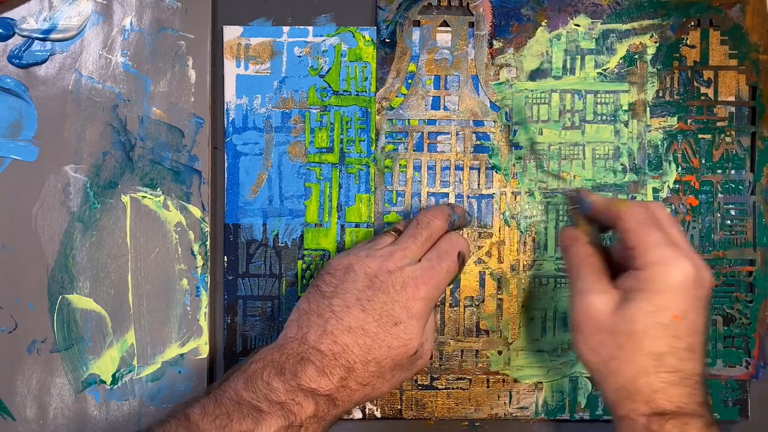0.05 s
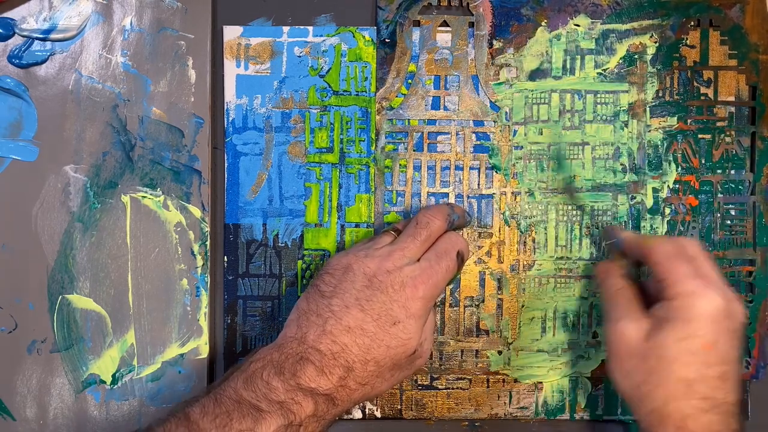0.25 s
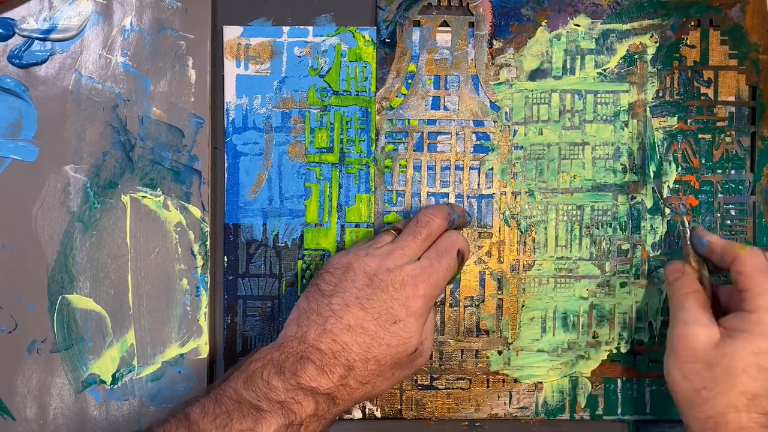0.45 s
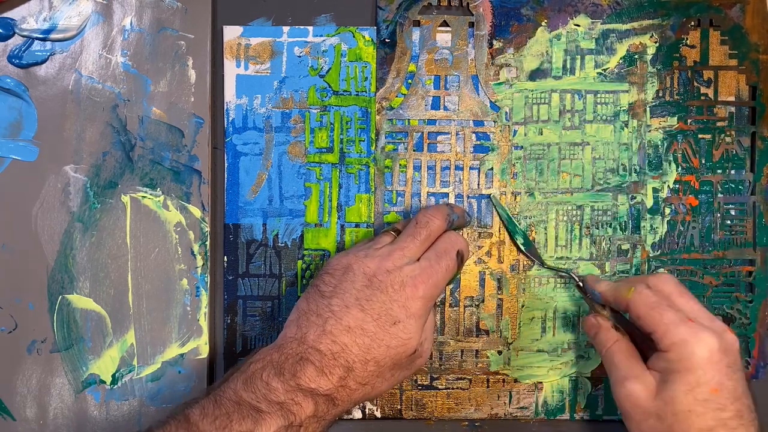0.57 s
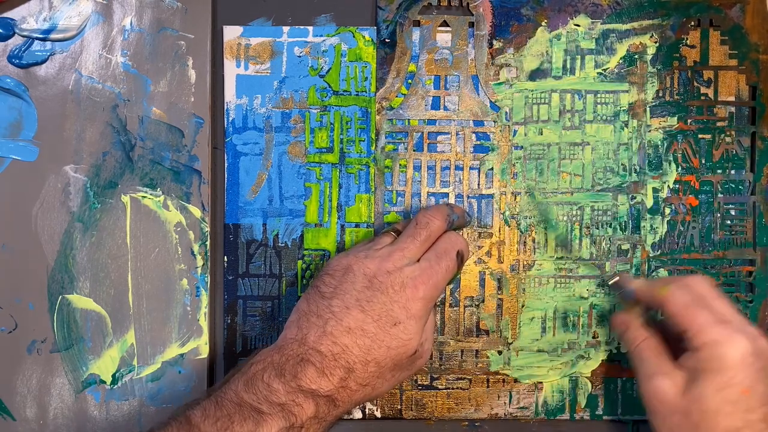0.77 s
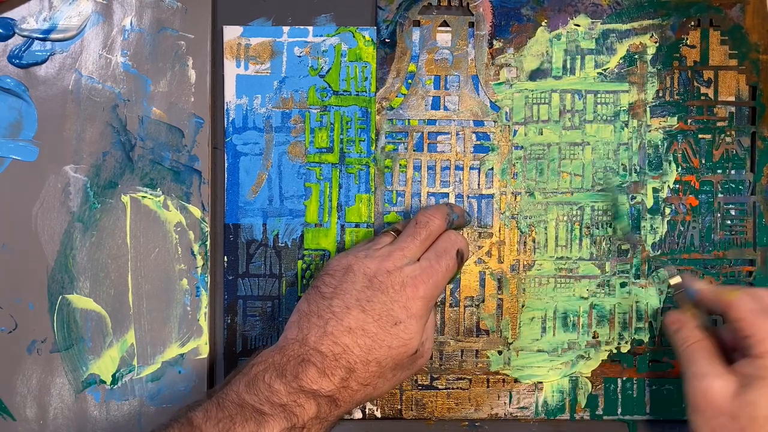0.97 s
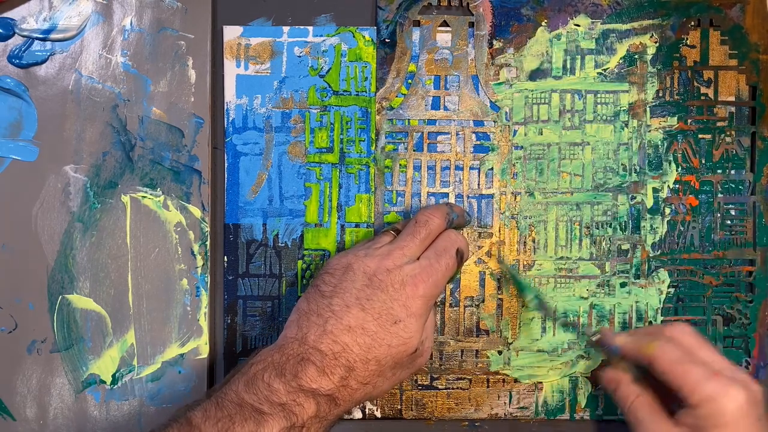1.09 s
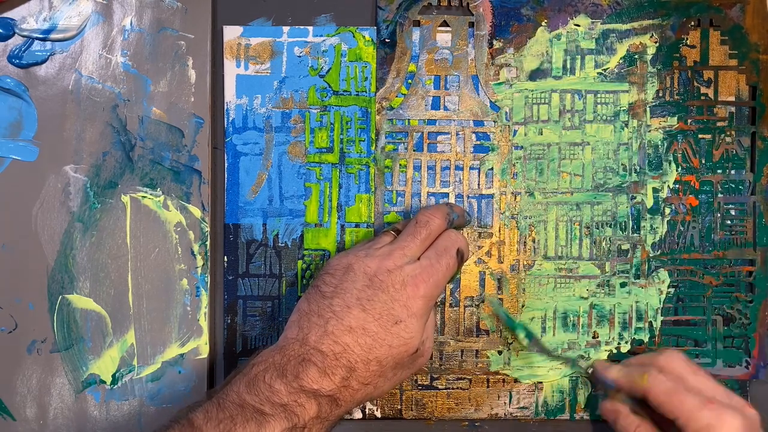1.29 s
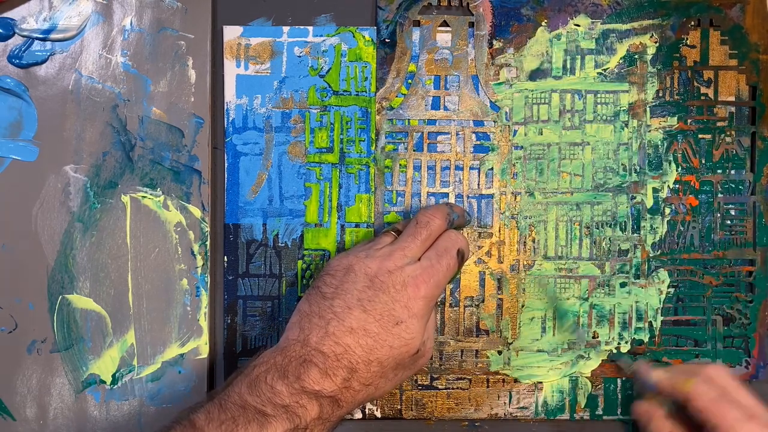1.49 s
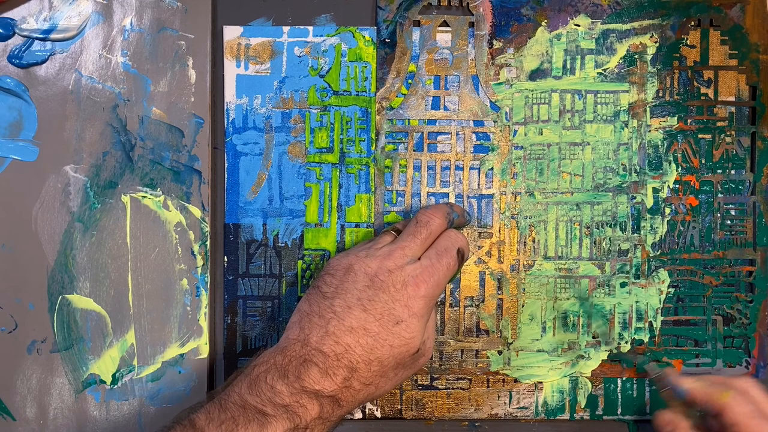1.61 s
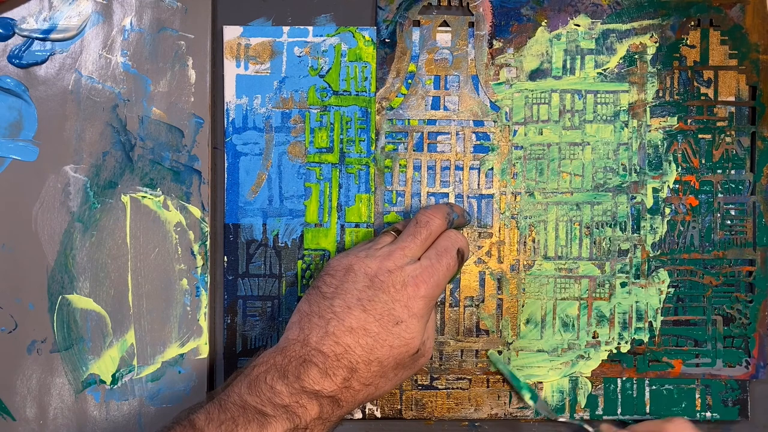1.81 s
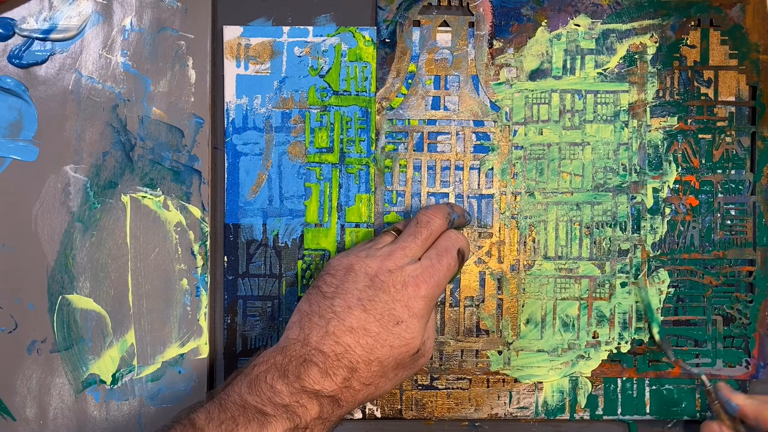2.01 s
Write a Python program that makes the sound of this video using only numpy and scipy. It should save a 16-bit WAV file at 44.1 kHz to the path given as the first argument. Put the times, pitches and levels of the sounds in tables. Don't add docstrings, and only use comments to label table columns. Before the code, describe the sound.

A thin steel palette knife rasps across a stiff stencil on a board in brief, regular strokes, some starting with a small tick, heard close with a dry small-room echo and faint low air puffs.

```python
import sys
import numpy as np
from scipy import signal
from scipy.fft import rfft, irfft, next_fast_len
from scipy.io import wavfile
from scipy.ndimage import uniform_filter1d, map_coordinates

SR = 44100
rng = np.random.default_rng(int(sys.argv[2]) if len(sys.argv) > 2 else 0)


def unload_audio(sound):
    columns = np.transpose(np.atleast_2d(sound))
    steps = np.round(np.clip(columns, -1, 1) * 32767)
    wavfile.write(sys.argv[1], SR, steps.astype(np.int16))


def gain_from_decibels(decibels):
    exponent = np.asarray(decibels, float) / 20
    return 10 ** exponent


N = 90404

# t/s, level/dB
EARLY_STROKES = [
    [(0, -43), (.012, -49), (.03, -56), (.07, -70)],
    [(.205, -66), (.226, -40), (.243, -35), (.26, -25.5), (.284, -30), (.312, -39), (.326, -36), (.34, -52)],
    [(.4835, -50), (.496, -46), (.501, -36), (.508, -35), (.512, -25), (.545, -24), (.558, -30), (.58, -42)],
    [(.728, -40), (.742, -38), (.75, -27), (.764, -25), (.79, -26), (.80, -30), (.816, -32), (.83, -44)],
    [(.98, -34), (.99, -31), (1.0, -25), (1.02, -26), (1.028, -30), (1.042, -27), (1.06, -31), (1.07, -40)],
]
# t/s, level/dB
LATE_STROKES = [
    [(1.204, -43), (1.214, -43), (1.224, -32), (1.234, -26), (1.258, -25.5), (1.27, -30.5), (1.287, -27),
     (1.297, -33), (1.315, -42)],
    [(1.448, -49.5), (1.462, -32), (1.484, -22), (1.5, -23.5), (1.512, -28), (1.525, -26), (1.535, -30.5),
     (1.55, -41)],
    [(1.693, -46.5), (1.702, -42), (1.712, -29.5), (1.722, -31), (1.728, -34.5), (1.737, -30.5),
     (1.785, -32), (1.805, -53)],
    [(2.007, -66), (2.026, -62), (2.033, -51), (2.05, -49.5)],
]
# board at touch level/dB, board at lift level/dB,
# low blade modes at touch level/dB, low blade modes at lift level/dB
BLADE_ANGLES = [(-4, 8.5, 3.5, 6.5), (-0.5, -14.5, -14, 1.5), (-3.5, -12.5, -13, -6), (-8.5, -7, -16, -1.5),
                (-17.5, -6.5, -11, -13.5), (-9.5, -11.5, -11.5, -2.5), (-15, -9, -18.5, 4.5),
                (-5.5, -12.5, -13, 7), (3, 4.5, -2.5, 3.5)]
# f/Hz, density/dB
RASP_COLOUR = [(530, -16), (900, -11.5), (1120, -22.5), (1340, -7.5), (4250, -6), (4920, -11), (5350, -3),
               (11600, -17.5), (16000, -31)]
# f/Hz, width/Hz, level/dB
LOW_BLADE_MODES = [(1260, 150, -6.5), (1490, 110, 3.5), (1844, 108, 9), (2310, 186, 1), (2780, 350, 0),
                   (3290, 130, -8.5)]
# f/Hz, width/Hz, level/dB
HIGH_BLADE_MODES = [(4360, 230, -4.5), (5420, 250, -1), (5820, 400, -0.5), (6470, 260, 0.5),
                    (7350, 270, -9.5)]
# f/Hz, width/Hz, level/dB
BOARD_MODES = [(171.3, 9.7, -5), (272, 87, -16.5), (490, 118, -4), (738, 147, -1.5), (850, 200, -2.5),
               (1032, 188, -5.5)]
# f/Hz, width/Hz, level/dB
TABLE_MODE = [(376.6, 18, 0)]
# f/Hz, density/dB
ROOM_TONE = [(60, -20), (110, 8), (220, 7), (450, 5), (800, -4), (2000, -4), (6000, -10), (16000, -17)]
# f/Hz, density/dB
RUMBLE_COLOUR = [(20, -7), (50, -1.5), (75, -7), (110, -35.5), (200, -79.5)]
# f/Hz, T60/s
STUDIO_DECAY = [(200, 0.42), (1500, 0.27), (5000, 0.23), (14000, 0.17)]
# t/s, peak level/dB, f/Hz
EDGE_CATCHES = [(0.258, -15, 816), (0.272, -13, 724), (0.509, -14, 2090), (0.515, -14, 807),
                (0.525, -14, 756), (0.54, -14, 5220), (0.564, -19, 834), (0.747, -15, 3870),
                (0.759, -13, 2620), (0.796, -16, 554), (0.806, -16, 721), (1.037, -14, 5630),
                (1.248, -15, 4150), (1.256, -14, 4230), (1.284, -17, 2450), (1.483, -10, 3130),
                (1.497, -10, 5250), (1.525, -15, 1470), (1.711, -17, 6000), (1.744, -18, 1810)]
# t/s, peak level/dB, f/Hz, bright snap over the peak level/dB
TOUCH_DOWNS = [
    (0.4834, -24.5, 1460, -18),
    (0.7284, -24.5, 1440, 7.5),
    (0.98, -7, 2040, -12),
    (1.2047, -17, 2190, -6),
    (1.4486, -28.5, 2140, -9),
    (1.693, -24.5, 1580, -5.5),
    (2.0057, -35.5, 1490, -17),
]
# f/Hz, density/dB
DULL_CRACK = [(250, -33), (600, -2.5), (1500, 5.5), (2500, -10), (4000, -36), (16000, -33.5)]
# f/Hz, density/dB
BRIGHT_SNAP = [(2500, -44), (4500, -8), (5900, 8.5), (8000, -10.5), (16000, -17.5)]
# t/s, level/dB, length/s
ARM_PUFFS = [
    (1.112, -49.5, 0.038),
    (1.135, -54, 0.079),
    (1.218, -48.5, 0.083),
    (1.447, -40.5, 0.031),
    (1.645, -50, 0.048),
    (1.698, -43.5, 0.05),
    (1.903, -49.5, 0.032),
    (1.99, -44.5, 0.065),
    (2.034, -58.5, 0.054),
]
# f/Hz, density/dB
PUFF_COLOUR = [(15, -9.5), (35, -0.5), (70, -11.5), (120, -17.5), (250, -76.5)]

LIFT_T60_S, CATCH_CYCLES, TICK_T60_S = 0.017, 3.6, 0.019
SLIPS_PER_S, SLIP_SPREAD_DB, CLUMP_DB, PATCH_DB = 20000, 1.5, 1.5, 4.2
LOW_BLADE_DB, BOARD_DB, SING_DB, TABLE_DB = -2.5, -2, -12.5, -24.5
STUDIO_DB, WALL_DB, AIR_DB, RUMBLE_DB = -9.5, -17.5, -68, -67


def unit(x):
    return x / np.sqrt(np.mean(x ** 2) + 1e-20)


def along(points, hz):
    f, value = np.transpose(points)
    return np.interp(np.log(hz + 1), np.log(f + 1), value)


def wobble(rate):
    knots = rng.standard_normal(int(N * rate / SR) + 4)
    return map_coordinates(knots, [np.arange(N) * rate / SR])


def filtered(x, response):
    size = next_fast_len(N + SR // 2)
    return irfft(rfft(x, size) * response(np.fft.rfftfreq(size, 1 / SR)), size)[:N]


def low_cut(x, cut_hz):
    return filtered(x, lambda hz: 1 / (1 + (cut_hz / (hz + 1)) ** 4))


def coloured(x, spectrum):
    return unit(filtered(x, lambda hz: gain_from_decibels(along(spectrum, hz))))


def noise(spectrum):
    return coloured(rng.standard_normal(N), spectrum)


def ringing(x, modes):
    def response(f):
        total = 0
        for k, (centre, width, db) in enumerate(modes):
            band = 1j * f * width
            total = total + (-1) ** k * gain_from_decibels(db) * band / (centre * centre - f * f + band)
        return total
    return unit(filtered(x, response))


def patchy(x, depth_db):
    z = signal.stft(x, nperseg=128)[2]
    field = uniform_filter1d(rng.standard_normal(z.shape), size=2, axis=0)
    field = uniform_filter1d(field, size=4, axis=1)
    return unit(signal.istft(z * gain_from_decibels(depth_db * unit(field)), nperseg=128)[1][:N])


def add(out, s, x):
    part = out[round(s * SR):][:len(x)]
    part += x[:len(part)]


def slips():
    hit = rng.random(N) < SLIPS_PER_S / SR
    return unit(hit * rng.standard_normal(N) * gain_from_decibels(SLIP_SPREAD_DB * rng.standard_normal(N)))


def stroke_pressures():
    t = np.arange(N) / SR
    edge, low, board = np.zeros(N), np.zeros(N), np.zeros(N)
    for rows, angle in zip(list(EARLY_STROKES) + list(LATE_STROKES), BLADE_ANGLES):
        board_touch_db, board_lift_db, low_touch_db, low_lift_db = angle
        s, db = np.transpose(rows)
        lift_db = -60 * np.maximum(t - s[-1], 0) / LIFT_T60_S
        press = (t >= s[0]) * gain_from_decibels(np.interp(t, s, db) + lift_db)
        ends = s[[0, -1]]
        edge += press
        low += press * gain_from_decibels(np.interp(t, ends, [low_touch_db, low_lift_db]))
        board += press * gain_from_decibels(np.interp(t, ends, [board_touch_db, board_lift_db]))
    return edge, low, board


def blade_rasp(edge, low):
    clump = gain_from_decibels(CLUMP_DB * (wobble(69.9) + 0.23 * wobble(300)))
    rasp = edge * coloured(patchy(slips(), PATCH_DB), [(250, -71)] + list(RASP_COLOUR))
    bend = gain_from_decibels(LOW_BLADE_DB) * low * ringing(patchy(slips(), 1), LOW_BLADE_MODES)
    return clump * (rasp + bend)


def blade_sing(edge):
    return gain_from_decibels(SING_DB + 5.2 * wobble(110)) * edge * ringing(slips(), HIGH_BLADE_MODES)


def board_thud(board):
    shaken = board * gain_from_decibels(1.66 * wobble(90)) * ringing(slips(), BOARD_MODES)
    return gain_from_decibels(BOARD_DB) * low_cut(shaken, 171)


def table_hum(edge):
    return gain_from_decibels(TABLE_DB) * edge * ringing(ringing(slips(), TABLE_MODE), TABLE_MODE)


def scrape():
    edge, low, board = stroke_pressures()
    return blade_rasp(edge, low) + blade_sing(edge) + board_thud(board) + table_hum(edge)


def room_air():
    rumble = gain_from_decibels(RUMBLE_DB + wobble(7.5)) * noise(RUMBLE_COLOUR)
    return gain_from_decibels(AIR_DB) * noise(ROOM_TONE) + rumble


def studio(x):
    out = np.zeros(N)
    for start in range(0, N, SR // 4):
        hz, t, z = signal.stft(rng.standard_normal(SR // 2), SR, nperseg=256)
        decay = gain_from_decibels(-60 * t / along(STUDIO_DECAY, hz)[:, None])
        tail = signal.istft(z * decay, SR, nperseg=256)[1]
        tail = gain_from_decibels(STUDIO_DB) * tail / np.linalg.norm(tail)
        walls = rng.integers(60, 1100, size=7)
        tail[walls] += gain_from_decibels(WALL_DB) * rng.uniform(-0.28, 1, size=7)
        add(out, start / SR + .003, signal.fftconvolve(x[start:start + SR // 4], tail))
    return out


def edge_catches():
    out, t = np.zeros(N), np.arange(SR // 30) / SR
    for s, db, hz in EDGE_CATCHES:
        life = 0.012 + CATCH_CYCLES / hz
        swell = 1 - np.exp(-t / 0.0021)
        add(out, s, gain_from_decibels(db) * np.sin(2 * np.pi * hz * t) * gain_from_decibels(-60 * t / life) * swell)
    return low_cut(out, 330)


def touch_downs():
    out, t = np.zeros(N), np.arange(SR // 30) / SR
    grit, steel = noise(DULL_CRACK), noise(BRIGHT_SNAP)
    for s, db, hz, bright_db in TOUCH_DOWNS:
        start = round(s * SR)
        crack_decay = gain_from_decibels(-60 * t / 0.0075) + .2 * gain_from_decibels(-60 * t / .05)
        crack = 0.53 * np.resize(grit[start:], len(t)) * crack_decay
        snap = gain_from_decibels(bright_db + 4) * np.resize(steel[start:], len(t)) * gain_from_decibels(-60 * t / .01)
        ring = 0.86 * np.sin(2 * np.pi * hz * t) * gain_from_decibels(-60 * t / (TICK_T60_S + 30 / hz))
        add(out, s, gain_from_decibels(db - 9) * (crack + snap + ring))
    return low_cut(out, 330)


def arm_puffs():
    t = np.arange(N) / SR
    gusts = np.zeros(N)
    for s, db, length in ARM_PUFFS:
        gusts += gain_from_decibels(db) * np.exp(-((t - s) / length) ** 2 * 2)
    return gusts * noise(PUFF_COLOUR)


def scene():
    knife = scrape() + edge_catches() + touch_downs()
    mono = knife + room_air() + studio(knife) + arm_puffs()
    return np.array([mono, mono])


def roll_off(x):
    return signal.sosfilt(signal.butter(12, 16500, fs=SR, output="sos"), x)


def record(dry):
    mono = filtered(dry[0], lambda hz: (hz < 16450) * gain_from_decibels(-18 * (hz > 15850)))
    return roll_off(np.array([mono, mono]))


dry = scene()
out = record(dry)
unload_audio(out)
```